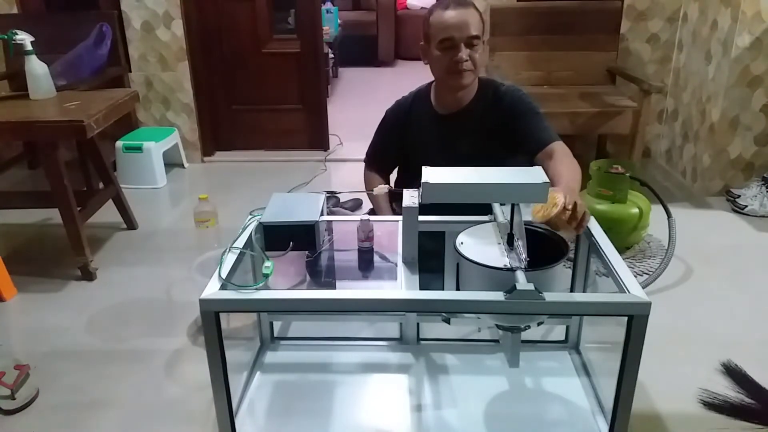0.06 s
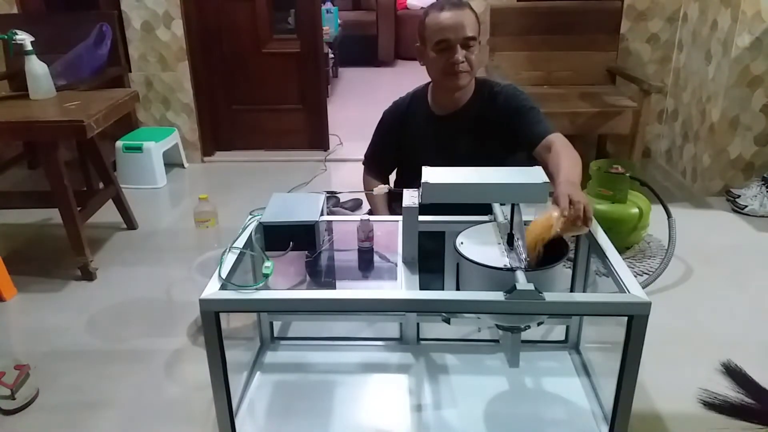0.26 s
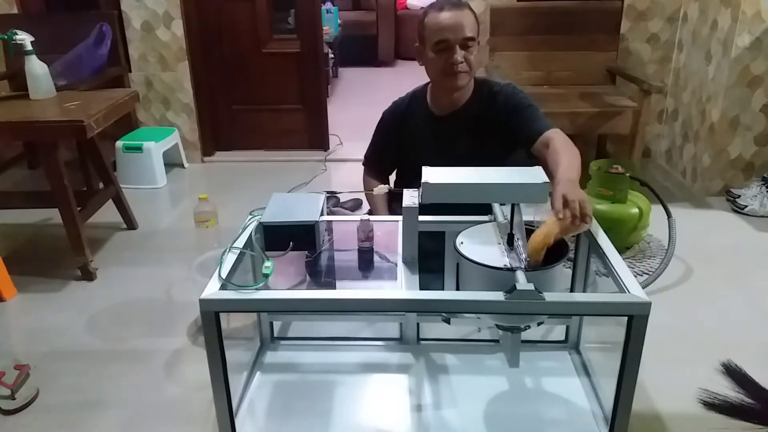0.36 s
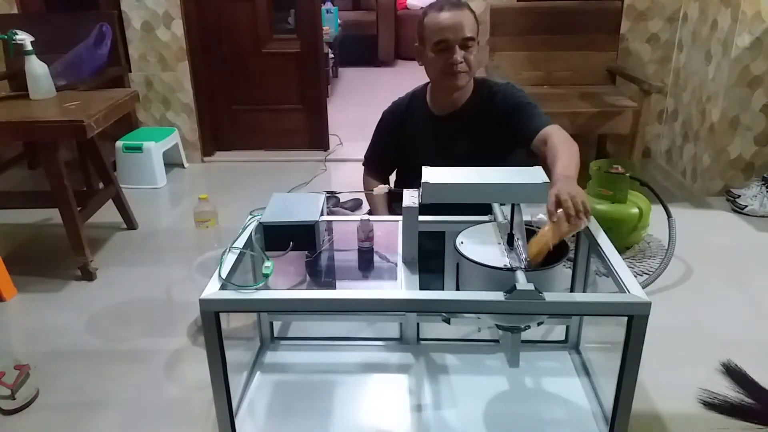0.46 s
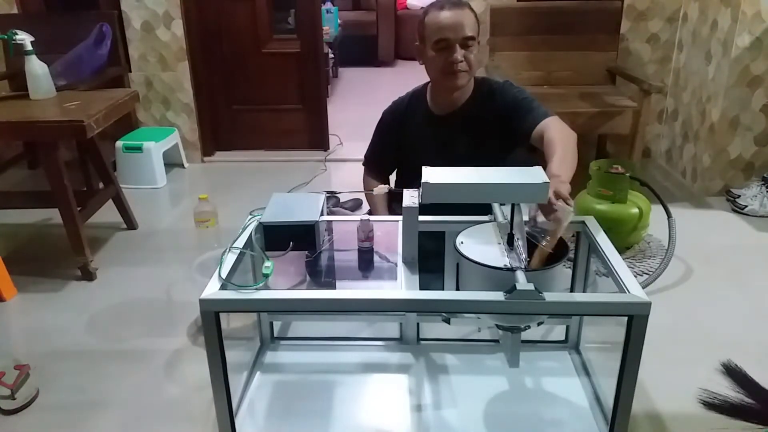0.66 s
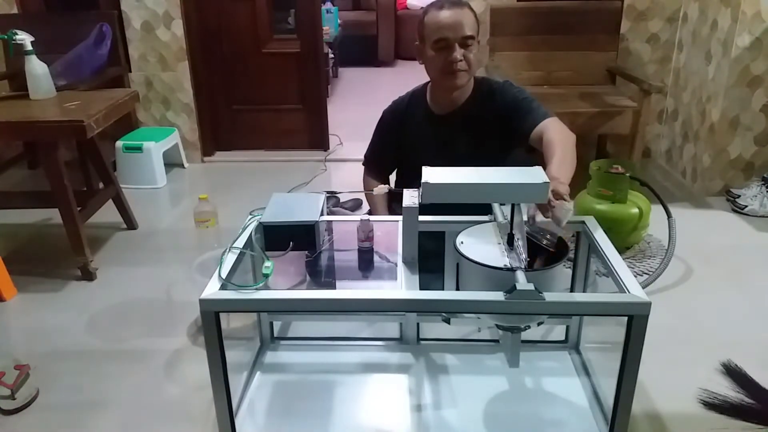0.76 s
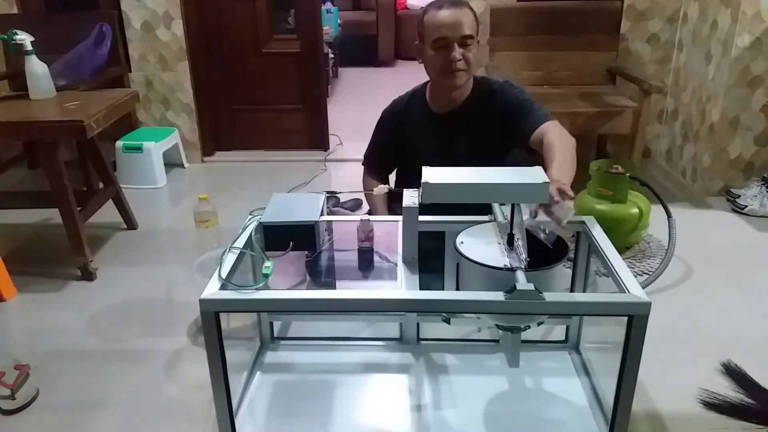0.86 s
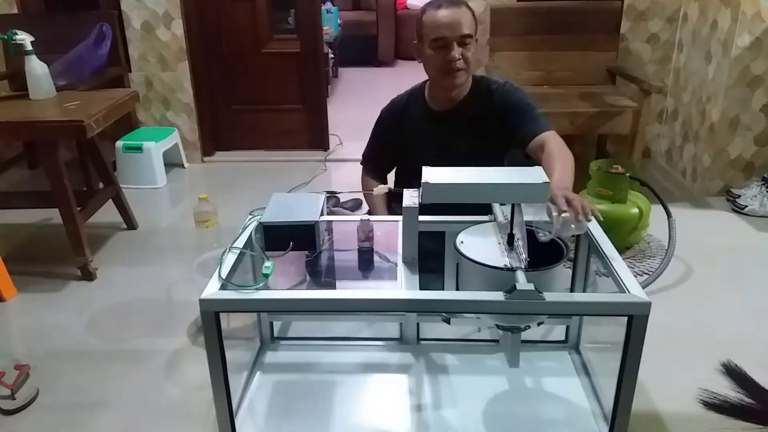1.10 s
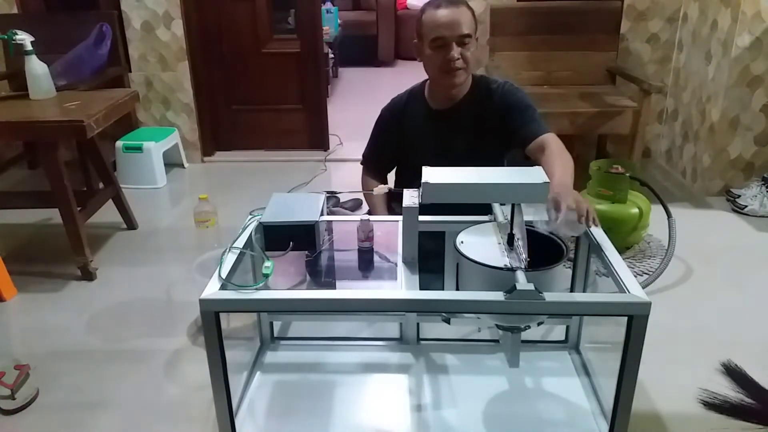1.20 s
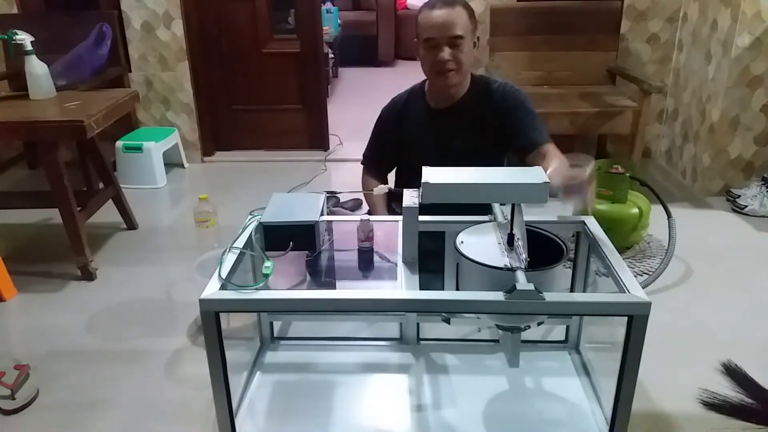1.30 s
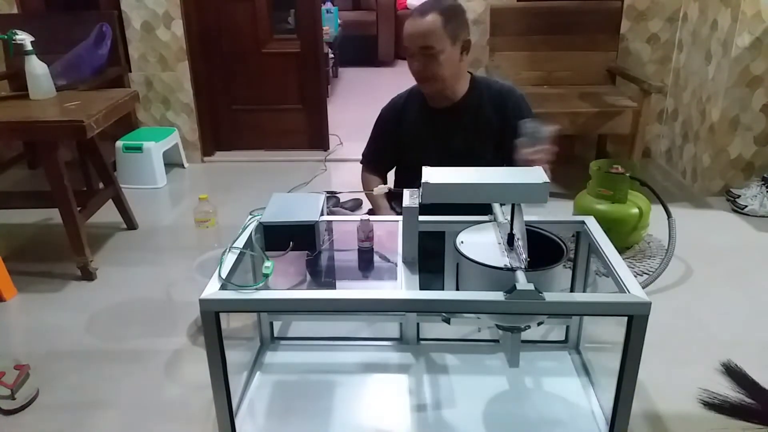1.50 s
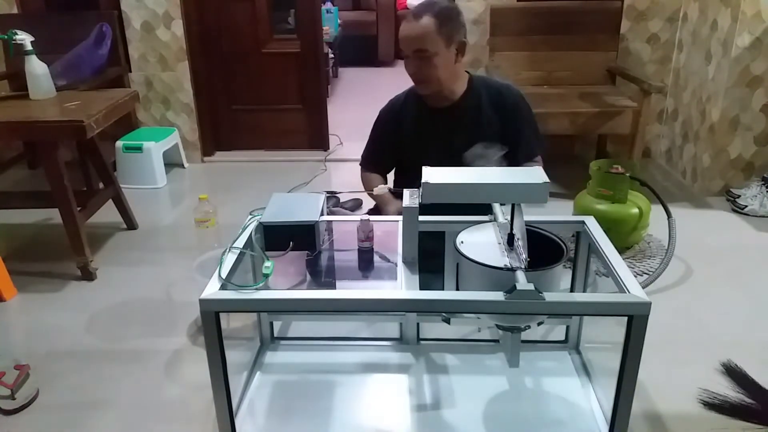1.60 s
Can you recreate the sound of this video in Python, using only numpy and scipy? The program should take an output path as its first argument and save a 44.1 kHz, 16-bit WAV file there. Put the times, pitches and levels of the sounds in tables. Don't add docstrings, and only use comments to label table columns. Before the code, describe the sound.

A quick pour of hard corn kernels clatters into a metal pot, crickets faint behind.

```python
import sys
import numpy as np
from scipy import signal
from scipy.fft import rfft, irfft, next_fast_len
from scipy.io import wavfile
from scipy.ndimage import map_coordinates

SR = 44100
rng = np.random.default_rng(int(sys.argv[2]) if len(sys.argv) > 2 else 0)


def linear_from_db(decibels):
    return 10 ** (np.asarray(decibels, float) / 20)


def int16_out(signal):
    q = np.round(np.clip(np.atleast_2d(signal).T, -1, 1) * 32767)
    wavfile.write(sys.argv[1], SR, q.astype(np.int16))


N = 72765
T = np.arange(N) / SR


def unit(x):
    return x / np.sqrt(np.mean(x ** 2) + 1e-20)


def along(points, hz):
    f, value = np.transpose(points)
    return np.interp(np.log(hz + 1), np.log(f + 1), value)


def curves(rows):
    s, *columns = np.transpose(rows)
    return [np.interp(T, s, column) for column in columns]


def wobble(knots_per_s):
    return map_coordinates(rng.standard_normal(N // 20), [T * knots_per_s])


def noise():
    return rng.standard_normal(N)


def filtered(x, response):
    size = next_fast_len(N + SR // 2)
    hz = np.fft.rfftfreq(size, 1 / SR)
    return irfft(rfft(x, size) * response(hz), size)[:N]


def causal(points):
    def response(hz):
        cepstrum = irfft(np.log(np.maximum(linear_from_db(along(points, hz)), 1e-4)))
        half = len(cepstrum) // 2
        cepstrum[1:half] *= 2
        cepstrum[half + 1:] = 0
        return np.exp(rfft(cepstrum))
    return response


def body(peaks, order=1):
    def response(f):
        total = 0
        for k, (hz, width_hz, db) in enumerate(peaks):
            loss = 1j * f * width_hz
            total = total + (-1) ** k * linear_from_db(db) * (loss / (hz * hz - f * f + loss)) ** order
        return response_sum(total)

    def response_sum(total):
        return total
    return response


def patter(per_s, spread_db):
    chance, size, sign = rng.random((3, N))
    strength = linear_from_db(-spread_db * np.log(size + 0.043))
    return unit((chance < per_s / SR) * strength * np.sign(sign - .5))


def pulses(per_s, jitter):
    count = np.cumsum(per_s * (1 + jitter * wobble(43))) / SR
    return np.diff(np.floor(count), prepend=0) * linear_from_db(3.09 * noise())


def tone(hz, drift_hz, knots_per_s):
    cycles = np.cumsum(hz + drift_hz * wobble(knots_per_s)) / SR
    return np.sqrt(2) * np.sin(2 * np.pi * cycles)


# time in seconds, flow level in dB, ring of the bare steel in dB.
STREAM = [
    (.186, -73, -3),
    (.19, -28, 6.5),
    (.203, -20.5, 2),
    (.214, -16, 3.5),
    (.29, -16, -9.5),
    (.34, -13, -12.5),
    (.4, -17, -11),
    (.45, -18.5, -25.5),
    (.8, -29, -19),
]
# time in seconds, peak in dB.
CLUMP_HITS = [(0.2167, -1.5), (0.2413, 5), (0.2584, 1), (0.2844, -5.5), (0.296, -3), (0.3264, 0),
              (0.3844, 2), (0.4354, -17), (0.4897, -8), (0.5544, -3), (0.5967, -7), (0.738, -20)]


def stream_flow():
    surge_db, clump_db, clump_decay_s, stop_s = 1.12, -20, 0.007, 0.046
    flow_db, ring_db = curves(STREAM)
    flow_db = flow_db - 20 * np.clip(T - STREAM[-1][0], 0, 1) / stop_s
    clumps = np.zeros(N)
    for s, db in CLUMP_HITS:
        above_flow = linear_from_db(db - np.interp(s, T, flow_db) + clump_db)
        clumps += (T >= s) * np.exp(-np.abs(T - s) / clump_decay_s) * above_flow
    flow = linear_from_db(flow_db + surge_db * wobble(70)) * (T > STREAM[0][0])
    return flow * (1 + clumps), ring_db


# frequency in Hz, level in dB.
KERNEL_CLICK = [(400, -42), (700, -22), (2750, -14.5), (5300, -3.5), (7900, -0.5), (9200, -15.5),
                (10800, -5), (15700, -5.5)]


def kernel_clicks(hits, flow):
    click = causal(KERNEL_CLICK)
    return filtered(hits * flow, click) / np.std(filtered(hits, click))


def chinks(count):
    median_hz, scatter, t60_s = 6703, .17, .015
    when_s, size = rng.random((2, count, 1))
    hz = np.clip(median_hz * np.exp(scatter * rng.standard_normal((count, 1))), 500, 15000)
    t, start = T[:600], (when_s * SR).astype(int)
    rings = linear_from_db(-4 * np.log(size + 0.0075) - 60 * t / t60_s) * np.sin(2 * np.pi * hz * t)
    out = np.bincount((start + np.arange(len(t))).ravel(), rings.ravel(), N)[:N]
    return out / np.std(out[:SR])


# frequency in Hz, level in dB, t60 in seconds, deadening by the heap (0-3).
STEEL_MODES = [(628.8, -12.5, 0.13, 0.91), (762, -14, .15, 2.1), (1008.5, -18, 0.059, 0.35),
               (1341.4, -12, 0.3, 1.7), (3020, -12.5, .12, 2.6), (3602, -6.5, .1, 2.8),
               (4291, -1.5, .12, 0.74), (5020, -19.5, .08, 0.73), (5167, -18, .08, 1.2),
               (5369, 0, .05, 1.4), (6170, -3, .05, .4), (7063, -7.5, 0.11, 1), (7272, -8.5, .08, .8),
               (7650, -11.5, .06, 0.36)]


def steel_ring(hits, flow, ring_db):
    sound = np.zeros(N)
    for hz, db, t60_s, deadens in STEEL_MODES:
        width_hz = 1.5 * np.log(1000) / np.pi / t60_s
        mode = body([(hz, width_hz, 0)], order=2)
        drive = hits * flow * linear_from_db(deadens * ring_db - 11.5 + db)
        sound += filtered(drive, mode) / np.std(filtered(hits, mode))
    return sound


# frequency in Hz, level in dB.
HEAP_THUD = [(100, -38), (150, -4.5), (330, -1.5), (500, 0.5), (1000, -16.5), (2000, -40)]


def heap_thuds(flow, ring_db):
    thuds = unit(filtered(patter(600, 4.3), causal(HEAP_THUD)))
    return linear_from_db(-41.5 - 0.49 * ring_db) * flow * thuds


def pour():
    flow, ring_db = stream_flow()
    hits = patter(per_s=4000, spread_db=3.5)
    clicks = kernel_clicks(hits, flow) + linear_from_db(-6.5) * flow * chinks(count=2500)
    return clicks + heap_thuds(flow, ring_db) + steel_ring(hits, flow, ring_db)


# time in seconds, level in dB.
CUP_SLIDE = [
    (0, -59),
    (.068, -50.5),
    (.071, -43),
    (.11, -39.5),
    (.113, -35.5),
    (.19, -33.5),
    (.4, -25.5),
    (.6, -70.5),
]
# frequency in Hz, level in dB.
CUP_WALL = [(410, -48), (700, -22.5), (1280, -20.5), (1660, -5.5), (1920, -2.5), (4320, 0), (6740, 1),
            (8990, -15.5), (16000, -14)]


def cup_slide():
    level_db, = curves(CUP_SLIDE)
    rub = unit(filtered(patter(5300, 2.44), causal(CUP_WALL)))
    sliding = (T > CUP_SLIDE[0][0]) * (T < CUP_SLIDE[-1][0])
    return rub * linear_from_db(level_db + wobble(44.1)) * sliding


# time in seconds, peak in dB.
SINGLE_DROPS = [
    (0.0473, -28.5),
    (0.0722, -25.5),
    (0.112, -24),
    (0.1884, -4),
    (0.9096, -19),
]


def single_drops():
    drops = np.zeros(N + SR)
    for s, db in SINGLE_DROPS:
        burst = linear_from_db(db - 3.5 - 60 * T[:300] / 0.02) * rng.standard_normal(300)
        drops[round(s * SR):][:300] += burst
    tick = causal([(500, -26.5), (3000, -17), (7000, -0.5), (9000, -13), (15000, -10.5)])
    return filtered(drops[:N], tick)


# frequency in Hz, t60 in seconds.
ROOM_DECAY = [(200, 0.9), (1000, 0.73), (4000, 0.54), (8000, 0.53), (15000, 0.25)]


def room(x):
    hz, t, z = signal.stft(rng.standard_normal((12, SR // 2)), SR, nperseg=256)
    decay = linear_from_db(-60 * t / along(ROOM_DECAY, hz)[:, None])
    tails = signal.istft(z * decay, SR, nperseg=256)[1]
    fades = np.clip(1 - np.abs(T * 10 - np.arange(12)[:, None]), 0, 1)
    parts = np.pad(x, (200, 0))[:N] * fades
    return signal.fftconvolve(parts, tails / np.linalg.norm(tails[0]), axes=1).sum(0)[:N]


# frequency in Hz, level in dB.
HIGH_CRICKET_WING = [(5600, -31), (6600, -7.5), (7100, 2.5), (7800, -9), (8300, -39.5), (12500, -46.5),
                     (13800, -26.5), (15500, -36)]


def high_crickets():
    chirp_db, chirps_per_s, chirp_peak_s = 2.5, 9.6, 1.365
    chirp = np.cos(2 * np.pi * chirps_per_s * (T - chirp_peak_s))
    swell = linear_from_db(chirp_db * chirp + .8 * wobble(1.4))
    teeth = unit(pulses(per_s=700, jitter=0.48)) * .3 + noise() * linear_from_db(0.91 * wobble(70))
    wing = causal([(3000, -67)] + HIGH_CRICKET_WING)
    return linear_from_db(-60) * unit(filtered(teeth * swell, wing))


# frequency in Hz, level in dB.
LOW_CRICKET_WING = [(1950, -34), (2150, -10), (2360, 0), (2560, -11), (2800, -36)]


def low_crickets():
    wing = causal([(900, -67)] + LOW_CRICKET_WING + [(5000, -63)])
    blur = unit(filtered(noise(), wing))
    trill = tone(2358, drift_hz=25, knots_per_s=90) * linear_from_db(3 * wobble(96))
    return linear_from_db(-72.5) * blur + linear_from_db(-73.5) * trill


# frequency in Hz, width in Hz, level in dB.
RUMBLE = [(53, 18, -4), (118, 40, -6), (240, 90, -9)]
# frequency in Hz, level in dB.
AIR = [(25, -10), (200, 0), (550, -10), (1100, -25), (2900, -31), (4600, -20), (9500, -37), (16000, -29)]


def night():
    motor = tone(116, drift_hz=7, knots_per_s=12) * linear_from_db(4 * wobble(9))
    rumble = unit(filtered(noise(), body(RUMBLE, order=2)))
    air = unit(filtered(noise(), lambda hz: linear_from_db(along(AIR, hz))))
    return linear_from_db(-70) * motor + linear_from_db(-70) * rumble + linear_from_db(-75) * air


# time in seconds, gain in dB.
RECORDER_GAIN = [
    (0, 9),
    (.2, 11.5),
    (.45, 4.5),
    (1.1, 1.3),
    (1.65, 3.9),
]


def scene():
    near = pour() + cup_slide() + single_drops()
    gain_db, = curves(RECORDER_GAIN)
    outside = high_crickets() + low_crickets() + night()
    mono = near + linear_from_db(-2) * room(near) + linear_from_db(gain_db) * outside
    return np.array([mono, mono])


def low_pass(x):
    return signal.sosfilt(signal.butter(12, 16300, fs=SR, output="sos"), x)


def record(dry):
    soft = dry / (1 + np.abs(dry / .93) ** 8) ** (1 / 8)

    def band(hz):
        bass_cut = hz ** 4 / (hz ** 4 + 42 ** 4)
        return bass_cut / (1 + np.exp(np.clip((hz - 15760) / 12, -50, 50)))
    mix = np.array([filtered(channel, band) for channel in soft])
    return low_pass(mix)


dry = scene()
out = record(dry)
int16_out(out)
```